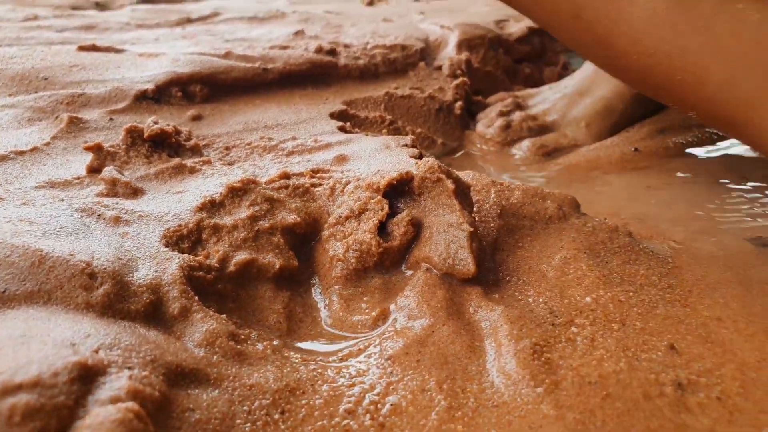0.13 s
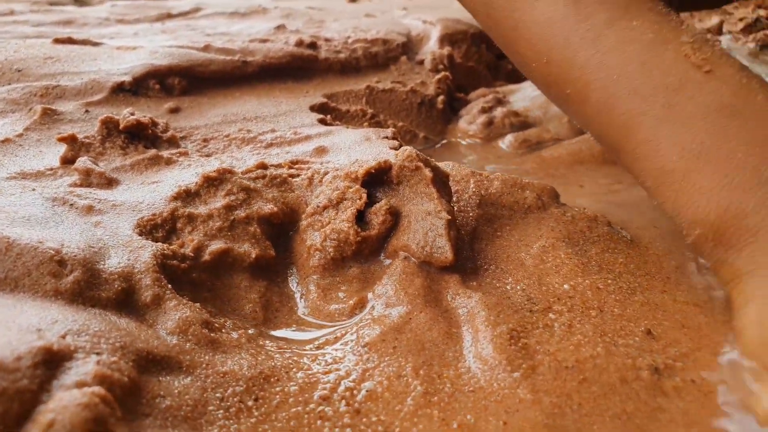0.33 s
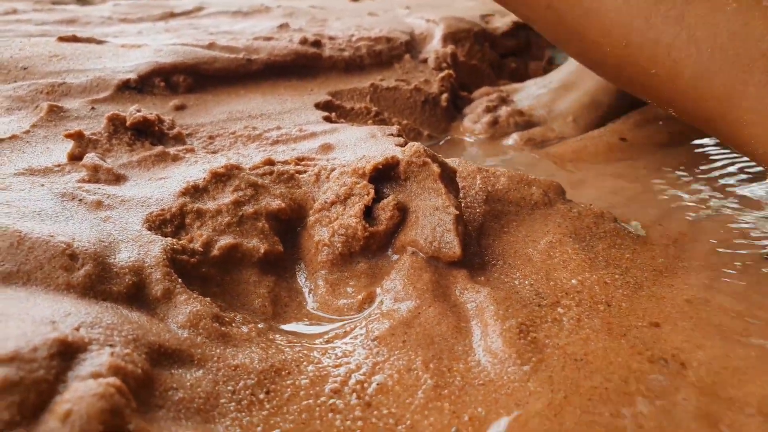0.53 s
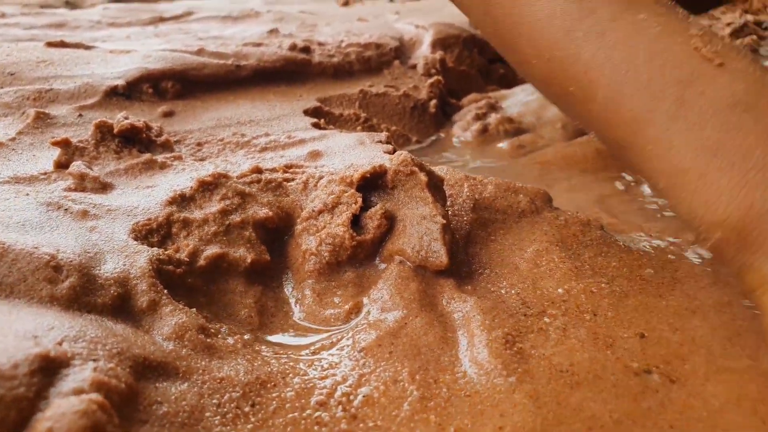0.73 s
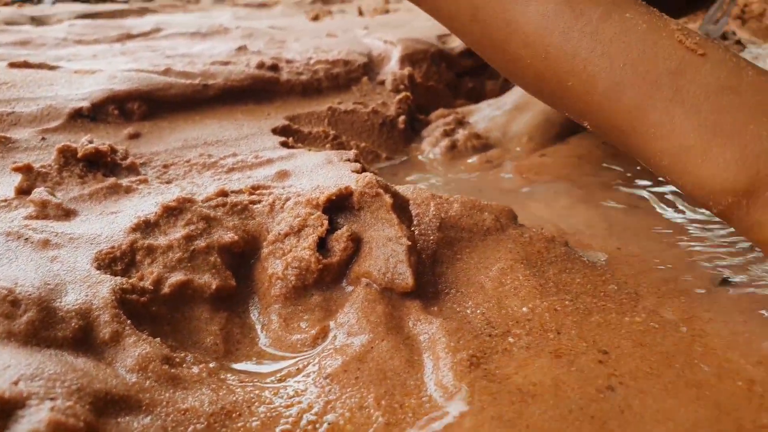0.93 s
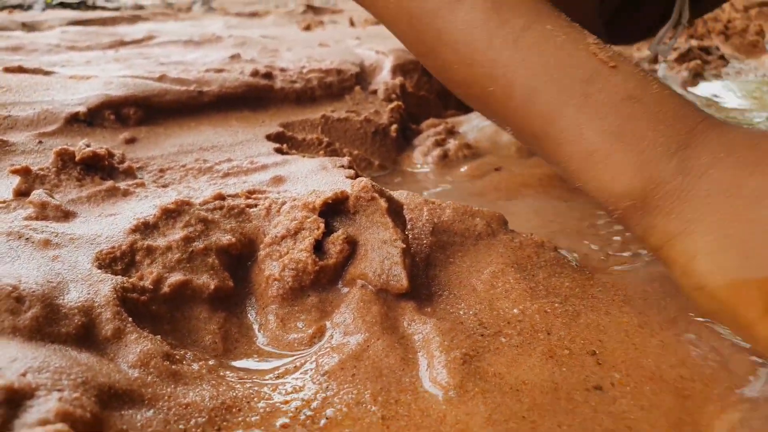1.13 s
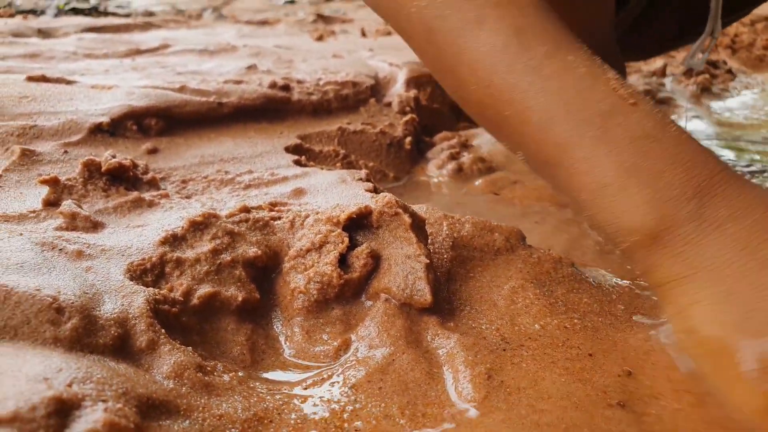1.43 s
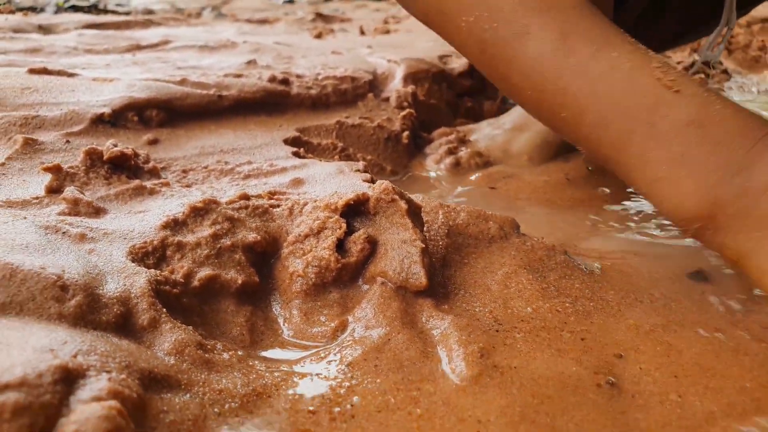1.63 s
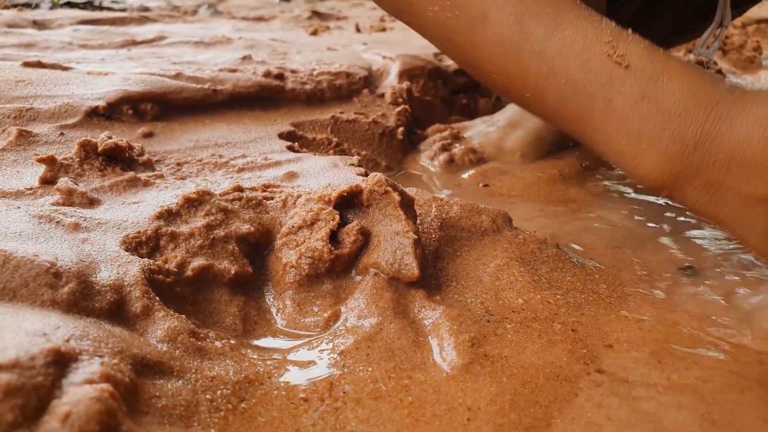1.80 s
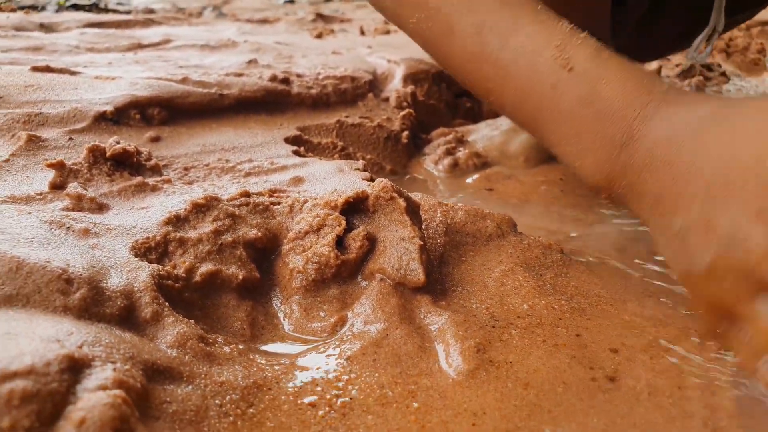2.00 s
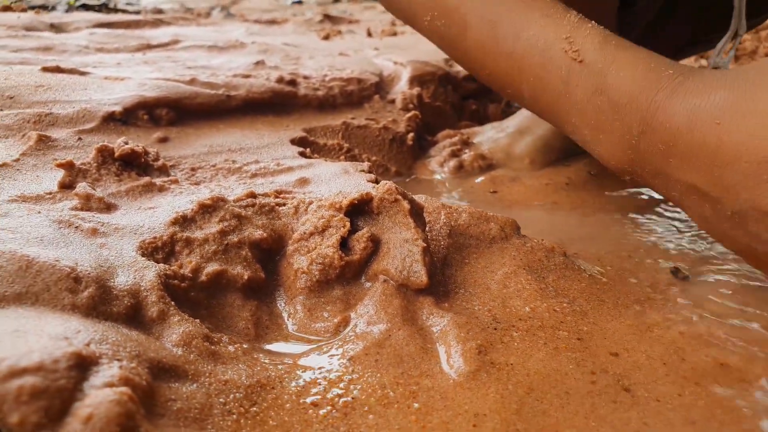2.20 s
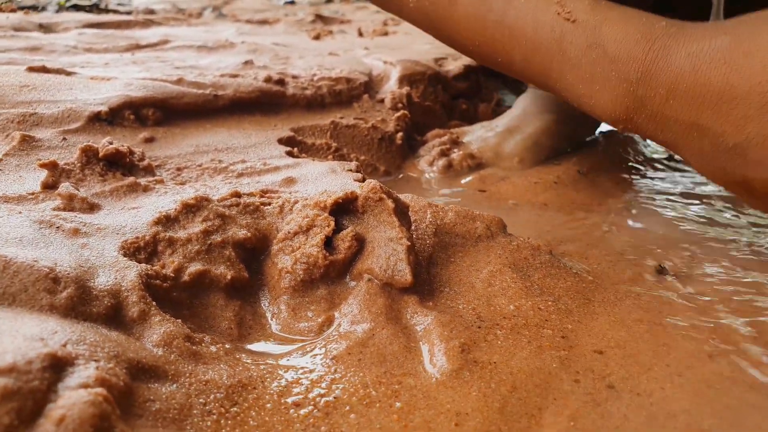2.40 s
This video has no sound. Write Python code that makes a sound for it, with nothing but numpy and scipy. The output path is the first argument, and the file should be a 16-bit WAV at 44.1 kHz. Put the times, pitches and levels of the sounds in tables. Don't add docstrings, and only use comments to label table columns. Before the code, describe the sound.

Close, wet sand squelches under scooping hands, strongest on the right. Bubbles and spitting clicks start near 0.2 s, with a sharp crackle at 0.44 s and another snap around 0.83 s. After a lull near 1 s, louder pops come at 1.35-1.4 s, denser squishing and sloshing from 1.55 to 2.07 s, and a last plopping burst around 2.2 s. Cicadas drone high throughout over faint distant rumble.

```python
import sys
import numpy as np
from scipy import signal
from scipy.fft import rfft, irfft, next_fast_len
from scipy.io import wavfile
from scipy.ndimage import uniform_filter1d, map_coordinates

SR = 44100
rng = np.random.default_rng(int(sys.argv[2]) if len(sys.argv) > 2 else 0)


def magnitude_from_level(level_db):
    exponent = np.asarray(level_db, float) / 20
    return 10 ** exponent


def transcribe(u):
    v = np.clip(np.atleast_2d(u).T, -1, 1)
    q = np.round(v * 32767).astype(np.int16)
    wavfile.write(sys.argv[1], SR, q)


N = 112454


def unit(x):
    return x / np.sqrt(np.mean(x ** 2) + 1e-20)


def along(points, hz):
    point_hz, value = np.transpose(points)
    return np.interp(np.log(hz + 1), np.log(point_hz + 1), value)


def curve(rows):
    return np.interp(np.arange(N) / SR, *np.transpose(rows))


def wobble(rate_hz):
    return map_coordinates(rng.standard_normal(2000), [np.arange(N) * rate_hz / SR])


def filtered(x, response):
    size = next_fast_len(N + SR // 2)
    return irfft(rfft(x, size) * response(np.fft.rfftfreq(size, 1 / SR)), size)[..., :N]


def rush(spectrum, alike, patchy_db):
    z = signal.stft(rng.standard_normal((2, N)), nperseg=512)[2]
    field = uniform_filter1d(rng.standard_normal(z.shape[1:]), size=6, axis=0)
    field = uniform_filter1d(field, size=10, axis=1)
    a, b = signal.istft(z * magnitude_from_level(patchy_db * unit(field)), nperseg=512)[1][:, :N]
    left = alike * a + np.sqrt(1 - alike ** 2) * b
    return unit(filtered(np.array([left, a]), lambda hz: magnitude_from_level(along(spectrum, hz))))


def place(s, rows):
    start = np.round(np.abs(s) * SR).astype(int)
    index = start[:, None] + np.arange(rows.shape[1])
    return np.bincount(index.ravel(), rows.ravel(), N + SR)[:N]


def lay(s, grains):
    lag_scatter_s, level_scatter_db = .00005, 1.8
    g = rng.standard_normal((len(s), 2))
    left = place(s + lag_scatter_s * g[:, 0], grains[0] * magnitude_from_level(level_scatter_db * g[:, 1:]))
    return np.array([left, place(s, grains[-1])])


def bubbles(s, db, hz, length_s, rise_oct, fade_db, rough, size, attack_cycles=.6):
    t = np.arange(size) / SR
    db, hz, length_s, rise_oct = (np.broadcast_to(v, len(s))[:, None] for v in (db, hz, length_s, rise_oct))
    u = t / length_s
    turns = np.cumsum(hz * 2 ** (rise_oct * np.minimum(u, 1) ** 1.3), axis=1) / SR
    attack = 1 - np.exp(-t * hz / attack_cycles)
    release = np.clip(5 - 5 * u, 0, 1)
    shape = magnitude_from_level(-fade_db * u) * attack * release
    shape = shape / shape.max(axis=1, keepdims=True)
    grit = unit(uniform_filter1d(rng.standard_normal((2, len(s), size)), size=15, axis=2))
    grit = rough * grit * magnitude_from_level(-12 * u)
    return lay(s, magnitude_from_level(db) * shape * np.sin(2 * np.pi * turns) * (1 + grit))


LONGEST_POP_S = .01
# start in seconds, peak in dB, pitch in Hz.
POPS = [(0.4392, -12, 3630), (0.4465, -23, 2400), (0.5117, -21.5, 3000), (0.5182, -30, 4030),
        (0.597, -30, 3400), (0.6492, -28.5, 3810), (0.6979, -29, 3110), (0.73, -30.5, 2380),
        (0.7919, -40, 2200), (0.836, -21.5, 3010), (0.8915, -27, 1850), (0.9708, -28.5, 4200),
        (1.1925, -32, 1580), (1.3539, -23.5, 2050), (1.4054, -10, 2455), (1.62, -18, 2490),
        (1.6457, -25, 2610), (1.76, -24.5, 1310), (1.8066, -27, 1600), (1.8476, -18, 3230),
        (1.911, -17.5, 2110), (1.9885, -17.5, 1905), (2.0666, -26, 3830), (2.2014, -13, 1110),
        (2.2597, -14.5, 1100)]


def pops():
    s, db, hz = np.transpose(POPS)
    length_s = np.minimum(21.4 / hz, LONGEST_POP_S)
    return bubbles(s, db, hz, length_s, rise_oct=0.13, fade_db=27, rough=0.44, size=1000)


# start in seconds, peak in dB, pitch in Hz.
TICKS = [(0.2886, -18, 5320), (0.4346, -11.5, 6000), (0.4399, -6.5, 5400), (0.4446, -7, 5950),
         (0.545, -19.5, 6060), (0.6134, -15, 5920), (0.8298, -14.5, 5870), (1.543, -21.5, 6080),
         (1.577, -19, 4580), (1.6012, -10.5, 5880), (1.673, -16, 4650), (1.768, -19.5, 5970),
         (1.9876, -15.5, 3326), (2.2025, -12, 1924), (2.2095, -16, 5550), (2.2498, -4.5, 5060),
         (2.2581, -17, 5720)]


def ticks():
    s, db, hz = np.transpose(TICKS)
    return bubbles(s, db, hz, 35.3 / hz, rise_oct=-0.17, fade_db=43, rough=0.5, size=500, attack_cycles=1.0)


# start in seconds, peak in dB, pitch in Hz.
SNAPS = [(0.4356, -5.5, 2670), (.4391, -13, 2760), (0.5113, -20, 3720), (0.8348, -19, 3480),
         (0.8893, -19, 2380), (0.8937, -27.5, 2490), (1.986, -24, 3240), (1.8473, -15, 2900),
         (2.2025, -13, 3020), (2.2487, -24, 890), (2.2594, -15, 1870)]


def snaps():
    s, db, hz = np.transpose(SNAPS)
    return bubbles(s, db, hz, 7.7 / hz, rise_oct=0.11, fade_db=60.5, rough=0.63, size=500, attack_cycles=0.9)


# start in seconds, peak in dB, pitch in Hz.
DROPS = [(.34, -44, 2290), (.3809, -39, 2110), (.418, -38, 2400), (0.5187, -35, 2320), (.5386, -33, 3740),
         (0.555, -38, 3560), (0.5666, -40, 3280), (0.668, -43, 3350), (0.679, -38, 3300),
         (0.7157, -39, 3600), (.7185, -38.5, 2100), (0.795, -40, 2940), (0.8271, -33, 2500),
         (1.111, -48.5, 2500), (1.1412, -43.5, 3560), (1.1585, -33, 4600), (1.1872, -32.5, 2090),
         (1.21, -46, 2500), (1.275, -49, 2520), (1.42, -33, 3100), (1.5175, -39, 1800), (1.579, -35, 2100),
         (1.657, -28, 3900), (1.668, -39.5, 580), (1.676, -29, 3770), (1.692, -32, 2490),
         (1.702, -33, 2630), (1.762, -30.5, 2140), (1.775, -24.5, 4200), (1.808, -31, 3350),
         (1.84, -40, 1280), (1.888, -38.5, 1470), (1.9097, -24, 3460), (1.91, -26.5, 1447),
         (1.924, -28, 3240), (1.939, -33.5, 1550), (1.951, -28, 2320), (2.007, -29.5, 4160),
         (2.011, -40, 1530), (2.032, -48, 2070), (2.1598, -41.5, 1830), (2.21, -33.5, 313),
         (2.22, -34, 1420), (2.266, -29, 4460), (2.2898, -31.5, 3700), (2.3963, -42.5, 3220)]


def droplets():
    s, db, hz = np.transpose(DROPS)
    length_s = np.minimum(29.6 / hz, LONGEST_POP_S)
    return bubbles(s, db, hz, length_s, rise_oct=.12, fade_db=30, rough=.75, size=1000, attack_cycles=1.1)


# start in seconds, peak in dB, start pitch in Hz, length in seconds, rise in octaves.
GLUGS = [(0.2215, -29.5, 1624, 0.021, 0.48), (0.2585, -25, 4460, 0.0063, -0.054),
         (0.2834, -20.5, 1718, 0.0224, 0.75), (.641, -31, 2000, 0.016, 0.11),
         (1.169, -38.5, 1085, 0.019, 0.18), (1.335, -30.5, 1600, 0.016, 0.3),
         (1.387, -15, 1320, 0.0041, 0.22), (1.392, -18, 1920, 0.0034, 0.74),
         (1.469, -30.5, 1740, 0.0076, 0.046), (1.569, -24.5, 1608, 0.0108, 0.53),
         (1.814, -33.5, 1336, 0.024, -0.091), (2.178, -26, 1190, 0.0081, 0.8),
         (0.8906, -22.5, 705, 0.016, -0.56), (0.904, -31, 348, 0.04, -0.43)]


def glugs():
    return bubbles(*np.transpose(GLUGS), fade_db=12, rough=.3, attack_cycles=.9, size=1900)


# start in seconds, peak in dB, pitch in Hz, length in seconds.
PLOPS = [
    (1.359, -31.5, 760, 0.021),
    (1.394, -33.5, 645, 0.08),
    (2.19, -21.5, 315, 0.0086),
    (2.2004, -20, 667, 0.0088),
]


def plops():
    return bubbles(*np.transpose(PLOPS), rise_oct=-0.26, fade_db=62, rough=0.92, size=2600)


def squelch():
    thin_hz = 950
    small = filtered(pops() + ticks() + snaps(), lambda hz: 1 / (1 + (thin_hz / (hz + 1)) ** 4))
    return magnitude_from_level(3) * (small + droplets() + glugs() + plops())


# frequency in Hz, level in dB.
BURST_COLOUR = [(3000, -59), (6500, -17), (8000, -20.5), (11000, -3), (13000, -12), (15500, -28)]


def film_bursts(s, db):
    burst_s = .0007
    g = rng.standard_normal((len(s), 2))
    t = np.arange(500) / SR / (burst_s * np.exp(.35 * g[:, :1]))
    a, b = magnitude_from_level(db[:, None]) * t * np.exp(1 - t) * rng.standard_normal((2, len(s), 500))
    tilt = .7 * np.tanh(g[:, 1:])
    left, right = (x + tilt * np.roll(x, 2, axis=1) for x in (.7 * (a + b), b))
    return magnitude_from_level(3) * filtered(lay(s, [left, right]), lambda hz: magnitude_from_level(along(BURST_COLOUR, hz)))


# start in seconds, peak in dB.
SPITS = [(0.2234, -21), (0.232, -15), (0.24, -9.5), (0.2578, -15.5), (0.288, -12.5), (0.3563, -15),
         (0.381, -23), (0.4059, -6.5), (0.4387, -7), (0.4451, -4.5), (0.539, -13), (0.5863, -14.5),
         (0.6684, -16.5), (0.6978, -19), (0.7295, -20), (0.7498, -17), (0.793, -12), (0.822, -4),
         (0.832, -12.5), (.3255, -18), (0.556, -29), (.601, -17), (.7152, -25.5), (.7695, -25),
         (1.0504, -20),
         (1.3368, -6), (1.3424, -18), (1.3617, -10), (1.3866, -8.5), (1.5747, -9), (1.5992, -5.5),
              (1.6751, -13), (1.705, -13.5), (1.7668, -12.5), (1.8512, -11), (1.91, -13), (1.9954, -15),
              (2.0552, -23), (2.0682, -11), (2.2013, -8.5), (2.2402, -18), (1.5294, -29), (1.5473, -19),
              (1.686, -23), (1.695, -26), (2.102, -21), (2.117, -17.5)]


def spits():
    return film_bursts(*np.transpose(np.array(SPITS)))


def bank(x):
    t60_s = .06
    tail = rng.standard_normal((2, 6000)) * magnitude_from_level(-60 * np.arange(6000) / SR / t60_s)
    return signal.fftconvolve(x, tail / np.linalg.norm(tail[0]), axes=1)[:, :N]


# time in seconds, effort in dB.
SCOOP = [(.2, -62), (.3, -45.5), (.45, -64.5), (.6, -59), (.85, -49.5), (1.05, -70.5), (1.2, -49.5),
         (1.3, -65.5), (1.4, -44), (1.5, -52.5), (1.7, -41.5), (1.87, -49.5), (1.96, -38), (2.13, -56.5),
         (2.22, -43), (2.33, -57), (2.45, -60.5), (2.55, -67)]
# frequency in Hz, density in dB per Hz.
SLOSH = [(300, -27), (700, -15), (2000, 19), (8000, -2), (11000, -19), (15500, -33)]


def slosh():
    rate_hz, centre_hz, spread = 300, 2900, .3
    u, g = rng.random((1200, 3)), rng.standard_normal(1200)
    s = np.cumsum(-np.log(u[:, 0] + 1e-9)) / rate_hz
    keep = s < N / SR
    s, u = s[keep], u[keep]
    hz = np.clip(centre_hz * np.exp(spread * g[keep]), 1500, 9000)
    size_db = -3.2 * np.log(u[:, 1:] + .02)
    length_s = 22 / hz * (.3 + u[:, 2])
    rise_oct = .6 * u[:, 2] - .2
    fizz = bubbles(s, 2 + size_db[:, 0], hz, length_s, rise_oct, fade_db=30, rough=.9, size=450,
                   attack_cycles=1.5)
    spray = film_bursts(s[::4] + 0.0037, 9 + size_db[::4, 1])
    trickle_db = -3 + 3 * wobble(90) + 1.5 * wobble(12)
    trickle = magnitude_from_level(trickle_db) * rush(SLOSH, .7, patchy_db=3)
    return magnitude_from_level(curve(SCOOP)) * (fizz + spray + trickle)


# time in seconds, level in dB.
SWELL = [
    (0.0, -48),
    (1.96, -45.5),
    (2.55, -47.5),
]
# frequency in Hz, density in dB per Hz.
CHORUS = [(3600, -62), (4250, -14), (4600, -6), (5400, 6), (6050, -4), (6400, -7.5), (6900, -11.5),
          (7800, -33), (10000, -80)]
# frequency in Hz, density in dB per Hz.
OVERTONE = [(4410, -33), (7500, -8.5), (8770, -9.5), (9450, -6), (11200, 0.5), (13000, -18), (15800, -28)]


def cicadas():
    swell_db = curve(SWELL) + 9 + 0.93 * wobble(8.86)
    flutter_db = wobble(200)
    song = rush(CHORUS, 0.063, patchy_db=1.5) + magnitude_from_level(-15) * rush(OVERTONE, 0.1, patchy_db=2.0)
    return magnitude_from_level(swell_db + flutter_db) * song


# start in seconds, end in seconds, level in dB, centre in Hz, width in Hz.
RASPS = [
    (1.72, 1.868, -50, 8550, 300),
    (2.417, 2.462, -37, 4380, 402),
]


def katydid():
    t = np.arange(N) / SR
    total = np.zeros((2, N))
    for start_s, end_s, db, centre_hz, width_hz in RASPS:
        band = filtered(rng.standard_normal((2, N)), lambda hz: np.exp(-((hz - centre_hz) / width_hz) ** 2))
        stroke = np.sin(np.pi * np.clip((t - start_s) / (end_s - start_s), 0, 1))
        total += magnitude_from_level(db) * stroke * unit(band)
    return total


# start in seconds, peak in dB, pitch in Hz.
HOOTS = [
    (0.112, -40.5, 304),
    (0.658, -38, 311),
    (1.258, -35.5, 311),
]


def frog():
    hoot_s = 0.018
    s, db, hz = np.transpose(HOOTS)
    t = np.arange(3000) / SR
    swell = np.sin(np.pi * np.clip(t / hoot_s, 0, 1))
    return lay(s, [magnitude_from_level(db + 0.5)[:, None] * swell * np.sin(2 * np.pi * hz[:, None] * t)])


# frequency in Hz, density in dB per Hz.
RUMBLE = [(18, -35), (30, 9), (64, 4.5), (220, -16.5), (305, -20), (600, -33.5), (780, -69), (1320, -120)]
# frequency in Hz, density in dB per Hz.
AIR = [(290, -39), (500, 4), (1100, -8.5), (2080, -6), (3000, -11), (4200, -10.5), (5460, -5), (9240, -120)]


def background():
    rumble_db = -38 + 0.17 * wobble(4.3)
    rumble = magnitude_from_level(rumble_db) * rush(RUMBLE, 0.92, patchy_db=1.15)
    return rumble + magnitude_from_level(-57.5) * rush(AIR, 0.33, patchy_db=1.5)


def ports(x, shade):
    lag_s = .00027
    left = filtered(x[0], lambda hz: magnitude_from_level(along(shade, hz)) * np.exp(-2j * np.pi * hz * lag_s))
    return np.array([left, x[1]])


# frequency in Hz, gain in dB.
SHADE = [(60, -5), (700, -17), (1400, -8), (2400, -15.5), (4200, -6.5), (6200, -20.5), (8300, -3),
         (11000, -14), (14000, -36)]
# frequency in Hz, gain in dB.
FAR_SHADE = [(100, -9), (700, -7.5), (4400, -5.5), (15000, -6)]


def scene():
    hands = squelch() + spits()
    near = hands + magnitude_from_level(-21) * bank(hands) + slosh()
    far = cicadas() + katydid() + background() + frog()
    return ports(near, SHADE) + ports(far, FAR_SHADE)


def roll_off(x):
    return signal.sosfilt(signal.butter(12, 16830, fs=SR, output="sos"), x)


def record(dry):
    low_hz, top_hz = 44, 16000
    x = filtered(dry, lambda hz: 1 / (1 + (low_hz / (hz + 1)) ** 8) / (1 + (hz / top_hz) ** 150))
    return roll_off(np.clip(x, -1, 1))


dry = scene()
out = record(dry)
transcribe(out)
```